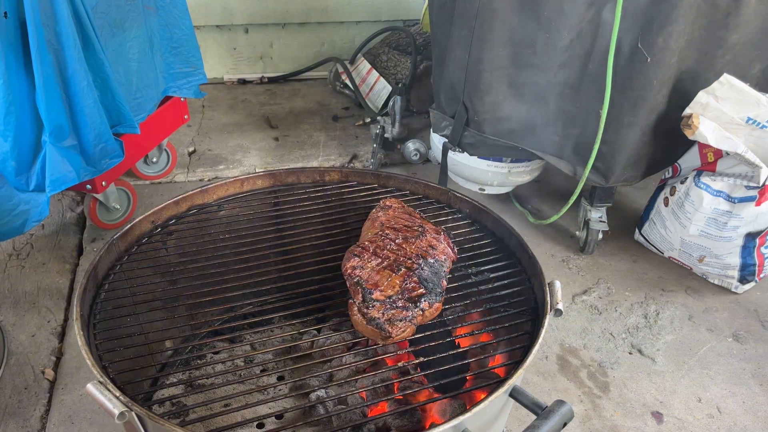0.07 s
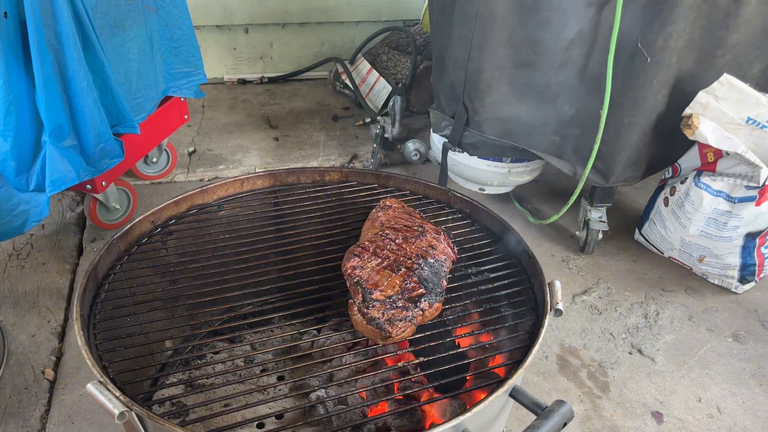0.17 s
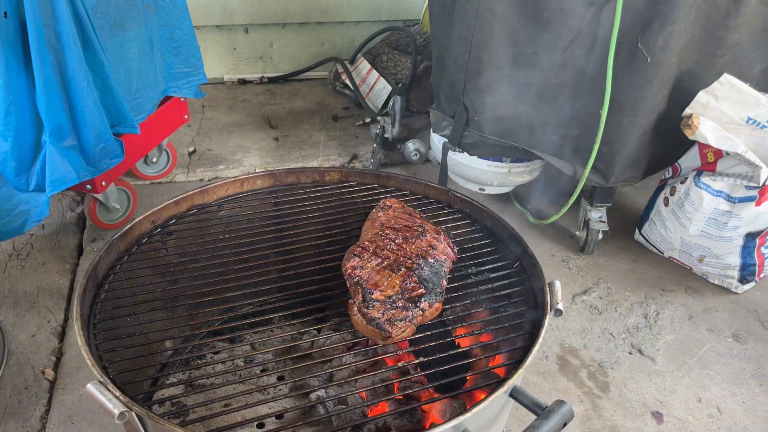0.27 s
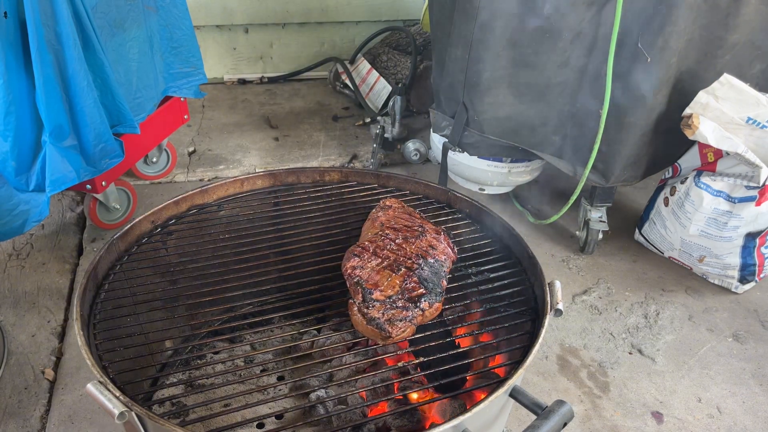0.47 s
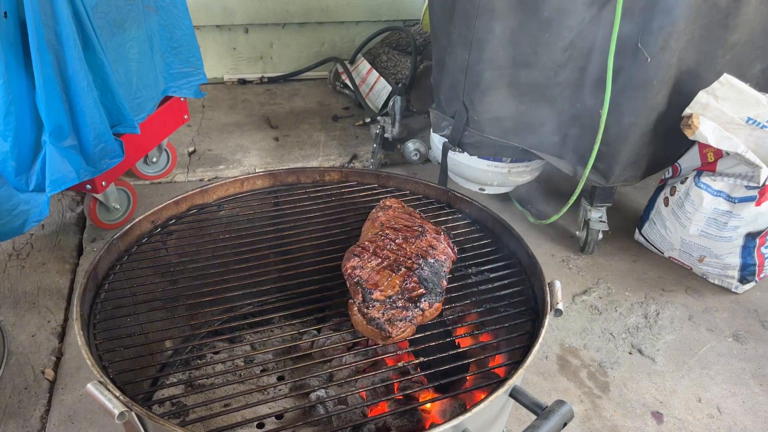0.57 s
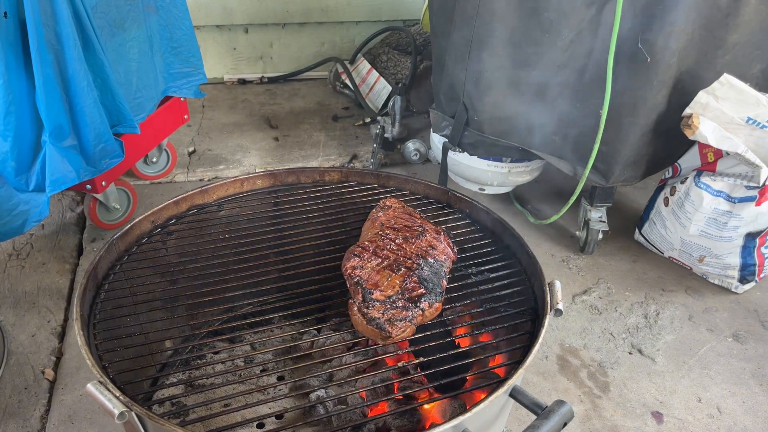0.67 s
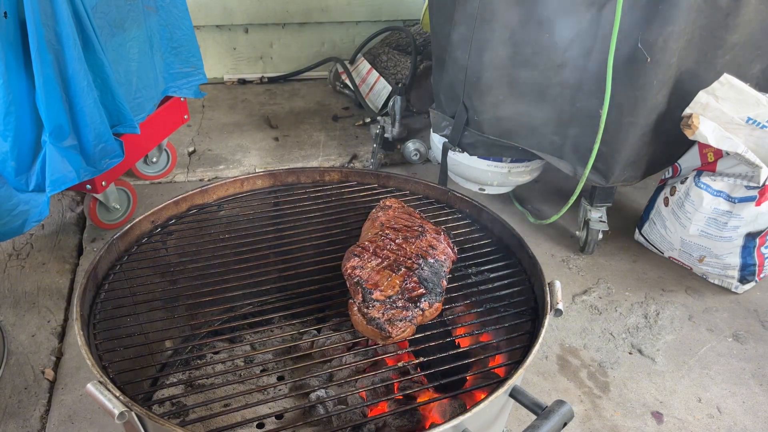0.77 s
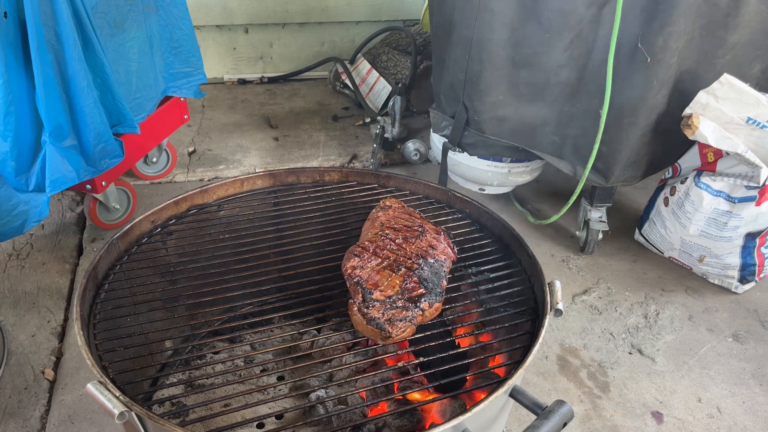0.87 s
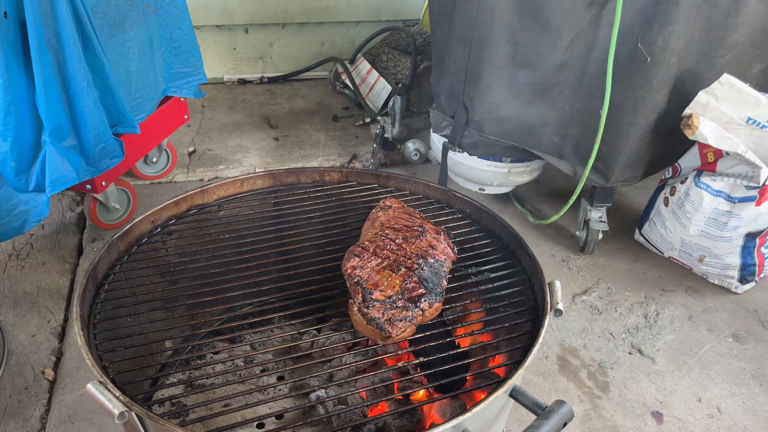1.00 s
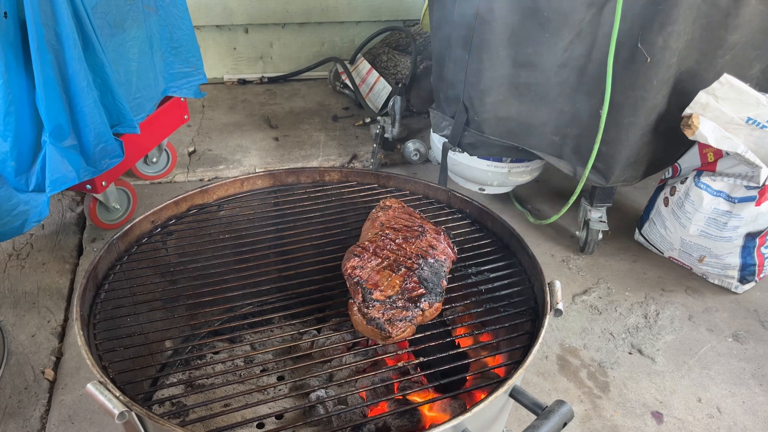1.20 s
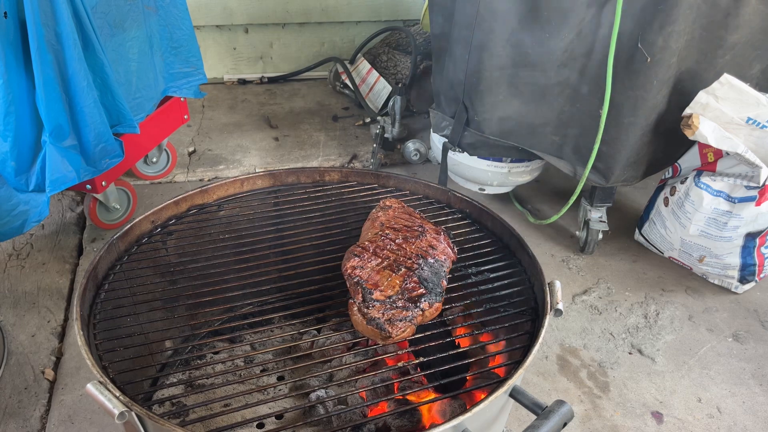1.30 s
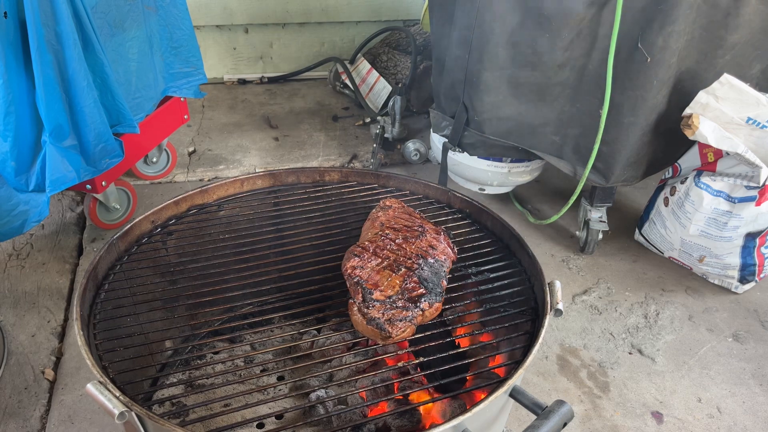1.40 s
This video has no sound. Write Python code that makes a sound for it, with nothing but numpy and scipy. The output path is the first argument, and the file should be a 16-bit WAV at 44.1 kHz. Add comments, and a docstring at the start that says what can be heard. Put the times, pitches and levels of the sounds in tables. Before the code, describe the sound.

A door bumps at about 0.25 seconds, slightly to the left, its hollow panel booming on, just after one faint ember tick from a charcoal grill. The latch clacks at 0.35 seconds. From 0.7 seconds the door slides with a soft rubbing swell and light knocks, ending near 1 second in a ringing metal double clack. A low outdoor rumble and faint hiss continue throughout.

```python
"""On a covered patio, a low outdoor rumble and a faint hiss go on throughout.
First an ember in a charcoal grill ticks once. Then something like a door bumps out of sight:
its hollow panel booms on and its latch clacks. Next it slides with a soft rubbing swell,
knocking lightly on its way. The slide ends in a double clack of ringing metal, like a latch."""
import sys
import numpy as np
from scipy import signal
from scipy.fft import rfft, irfft
from scipy.io import wavfile

SR = 44100
rng = np.random.default_rng(int(sys.argv[2]) if len(sys.argv) > 2 else 0)


def generate_wav(sig):
    """Save sig (samples, or channels by samples) to the path in sys.argv[1] as 16-bit PCM at SR."""
    pcm = np.round(np.clip(np.atleast_2d(sig).T, -1, 1) * 32767).astype(np.int16)
    wavfile.write(sys.argv[1], SR, pcm)


N = 63945
T = np.arange(N) / SR

# how alike the door's noises are on the left and right: (frequency [Hz], likeness [1 = the same])
DOOR_LIKENESS = [(130, .99), (300, .9), (520, .8), (1000, .65), (2000, .8), (4000, .68), (6500, .65),
                 (9000, .88)]


def from_db(db):
    """Turn decibels into a number to multiply by."""
    return 10 ** (np.asarray(db) / 20)


def unit_level(x):
    """Scale a sound so that its average power is 1."""
    return x / np.sqrt(np.mean(x ** 2) + 1e-20)


def at_hz(table, hz):
    """Read a table between its rows, giving each octave equal room."""
    row_hz, value = np.transpose(table)
    return np.interp(np.log(hz + 1e-9), np.log(row_hz), value)


def cut(x, keep, hz, order=2):
    """Keep the "low" or the "high" side of a frequency."""
    return signal.sosfilt(signal.butter(order, hz, keep, fs=SR, output="sos"), x + 1e-18)


def flicker(rate_hz):
    """A smooth random wobble, about 1 in size."""
    r = np.exp(-2 * np.pi * rate_hz / SR)
    return unit_level(signal.lfilter([1], [1, -2 * r, r * r], rng.standard_normal(2 * N))[N:])


def clicks(rows):
    """One click for each (time [s], level [dB])."""
    out = np.zeros(N)
    for s, db in rows:
        out[int(s * SR)] += from_db(db)
    return out


def ring(force, tones):
    """A push sets an object's own tones ringing; each drops 60 dB in its fade time."""
    out = 0
    for hz, db, fade_s in tones:
        r = np.exp(-np.log(1000) / (fade_s * SR))
        w = 2 * np.pi * hz / SR
        tone = signal.lfilter([0, np.sin(w)], [1, -2 * r * np.cos(w), r * r], force + 1e-18)
        out = out + from_db(db) * tone
    return out


def noise(spectrum, likeness, envelope=lambda hz: 1):
    """Stereo noise built in narrow bands; the envelope shapes the loudness of each band."""
    edges = 22 * 2 ** (np.arange(30) / 3)  # three bands to the octave
    white = rng.standard_normal((2, 2, N + SR // 10))
    out, power = 0, 0
    for k, (low, high) in enumerate(zip(edges, edges[1:])):
        band_filter = signal.butter(2, [low, high], "band", fs=SR, output="sos")
        common, side = signal.sosfilt(band_filter, white[k % 2])[:, -N:]
        hz = np.sqrt(low * high)
        alike = np.clip(at_hz(likeness, hz), -1, 1)
        band = unit_level(np.sqrt(1 + alike) * common + np.sqrt(1 - alike) * side * [[1], [-1]])
        gain = from_db(at_hz(spectrum, hz)) * np.sqrt(high - low)
        out = out + gain * envelope(hz) * band
        power += gain ** 2
    return out / np.sqrt(power)


def background():
    """The open air carries a distant rumble and an even hiss."""
    # the rumble's shape: (frequency [Hz], relative level [dB])
    rumble = [(20, -47), (40, -37), (57, 2), (80, -8), (120, -8.5), (200, -15.5), (400, -19.5), (1000, -29),
              (3000, -42.5)]
    # the hiss's shape: (frequency [Hz], relative level [dB])
    hiss = [(300, -21), (1500, -1.5), (3200, 2.5), (4500, 0.5), (6300, 2.5), (8500, 2), (10500, 6.5),
            (13000, -1), (15500, 0)]
    # how alike left and right are: (frequency [Hz], likeness [1 = the same])
    likeness = [(60, .97), (150, .9), (300, .55), (600, .25), (1300, .1), (2400, .75), (4800, .5),
                (9000, .82)]
    return from_db(-48) * noise(rumble, likeness) + from_db(-52) * noise(hiss, likeness)


def ember():
    """Two tiny, thin snaps in the charcoal, so close that they make one tick."""
    # the snaps: (time [s], relative level [dB])
    snaps = [(0.1202, -29), (0.1221, -29.5)]
    # the charcoal's tones: (frequency [Hz], relative level [dB], fade time [s])
    tones = [(3650, -10, 0.0018), (10000, 5, 0.0005), (14200, -8, 0.00091)]
    return cut(ring(clicks(snaps), tones), "high", hz=1500, order=1)


def latch():
    """Each clack stops the metal's ring and strikes it afresh, with a crack and a wash of echoes."""
    # the clacks: (time [s], relative level [dB], treble lift [dB])
    clacks = [(0.3504, -6, 2), (0.9642, -4, -4), (0.9687, -4.5, -2.5), (0.9911, -3.5, -0.5)]
    # the metal's tones: (frequency [Hz], relative level [dB], fade time [s])
    tones = [(1220, -46.5, 0.4), (2070, -43, 0.19), (2169, -41, 0.16), (2850, -47, 0.22), (2960, -35, 0.14),
             (3320, -38.5, 0.091), (5360, -40.5, 0.22), (6830, -35.5, 0.12), (7750, -48, 0.21),
             (9420, -42.5, 0.095)]
    # the noise of a clack: (frequency [Hz], relative level [dB])
    spectrum = [(500, -18), (1200, -5), (2200, -2), (4200, -8.5), (5500, 5.5), (7500, -6), (11000, -6.5),
                (16000, -12)]
    wash_fade_s, crack_s = 0.23, 0.0027
    next_times = [row[0] for row in clacks[1:]] + [np.inf]
    out = 0
    for (s, db, lift_db), next_s in zip(clacks, next_times):
        strike_db = lambda hz: db + lift_db * np.clip(np.log2(hz / 4000), -1, 1)
        struck_tones = [(hz, level + strike_db(hz), fade_s) for hz, level, fade_s in tones]
        metal = (T < next_s) * ring(clicks([(s, 0)]), struck_tones)
        age = np.maximum(T - s, 0)
        wash = np.exp(-np.log(1000) * age / wash_fade_s)
        crack = from_db(3) * np.exp(-age / crack_s)
        rush = noise(spectrum, DOOR_LIKENESS, lambda hz: from_db(strike_db(hz)))
        out = out + metal + from_db(-36.5) * (T >= s) * (wash + crack) * rush
    return out


def brush():
    """The panel brushes lightly before it takes weight and slides."""
    # the brushing noise: (frequency [Hz], relative level [dB])
    spectrum = [(700, 0), (2000, -2), (3300, 7), (5000, -3), (7000, -0.5), (10000, 0.5), (16000, -19)]
    start_s, rise_s, hold_s, fall_s = 0.629, 0.019, 0.089, 0.11
    age = T - start_s
    touch = np.clip(age / rise_s, 0, 1) * np.exp(-np.maximum(age - hold_s, 0) / fall_s)
    return from_db(-48.5) * touch * noise(spectrum, DOOR_LIKENESS)


def slide():
    """Grainy rubbing follows how hard the door is pushed and sets a few tones singing."""
    # the push: (time [s], effort [dB])
    effort = [(0.722, -21), (0.742, 2), (0.82, 0), (0.875, 4), (0.935, -1.5), (1.0, 1), (1.04, -6),
              (1.10, -12), (1.45, -27.5)]
    # the rubbing noise: (frequency [Hz], relative level [dB])
    spectrum = [(50, -12), (78, 14), (140, 8), (260, -1), (430, 2), (850, -7), (1100, -3.5), (2100, -4),
                (3300, -7.5), (4800, -15), (9000, -17), (16000, -26)]
    # the tones that sing: (frequency [Hz], relative level [dB], fade time [s])
    tones = [(138, -36.5, 0.53), (371.7, -50, 0.51), (418.8, -40, 0.29), (632, -54, 0.26), (760, -53, 0.85),
             (1069, -42, 0.45), (1344, -40.5, 0.33), (1630, -44, 0.19), (2070, -39, 0.13),
             (2420, -50, 0.084), (2860, -38, 0.085), (3225, -37.5, 0.11), (3327, -44, 0.11)]
    effort_db = np.interp(T, *np.transpose(effort), left=-100)
    friction = from_db(effort_db + flicker(rate_hz=160))  # about 1 dB of grain
    singing = from_db(-42) * ring(friction * rng.standard_normal(N), tones)
    rubbing = from_db(-41) * friction * noise(spectrum, DOOR_LIKENESS)
    return rubbing + singing


def thump():
    """Rattle and echoes build up after the door's first touch and die away, the treble first."""
    # the thump's noise: (frequency [Hz], relative level [dB])
    spectrum = [(45, -27), (120, 0.5), (220, -4), (320, -3.5), (480, -5.5), (700, -12), (1500, -12),
                (3200, -14.5), (4600, -23.5), (7000, -24.5), (10000, -28), (16000, -46)]
    # how fast it swells: (frequency [Hz], build-up time [s])
    build_times = [(100, 0.021), (1000, 0.014), (3000, 0.015), (7000, 0.0016)]
    # how fast it dies away: (frequency [Hz], fade time [s])
    fade_times = [(100, 1), (450, 0.76), (1200, 0.59), (3200, 0.43), (8000, 0.23)]
    start_s, first_touch_share, crack_s = 0.2372, 0.35, 0.003
    age = T - start_s

    def envelope(hz):
        build_s = at_hz(build_times, hz)
        rise = first_touch_share + (1 - first_touch_share) * np.clip(age / build_s, 0, 1)
        crack = 0.33 * np.exp(-np.maximum(age, 0) / crack_s)
        fade = np.exp(-np.log(1000) * np.maximum(age - build_s, 0) / at_hz(fade_times, hz))
        return (age > 0) * (rise + crack) * fade
    return from_db(-23.5) * noise(spectrum, DOOR_LIKENESS, envelope)


def panel():
    """Hard and soft bumps ring the same hollow panel, which gives off little deep bass."""
    # the panel meets its frame hard, then with its full weight, bounces once, and later knocks softly:
    # (time [s], relative level [dB], brightness [Hz])
    bumps = [(0.2389, -11, 619.7), (0.25, -2.5, 486), (0.2649, 1.5, 220), (0.2776, 0, 228),
             (0.2998, -9.5, 715), (0.7444, -23, 467), (0.8302, -14.5, 181.5), (0.8579, -14, 175),
             (0.9243, -14.5, 171), (1.055, -24.5, 172)]
    # the panel's tones: (frequency [Hz], relative level [dB], fade time [s])
    tones = [(59.3, -34, 0.67), (80.1, -34.5, 1.95), (118.4, -33.5, 1.8), (137.4, -31, 1.2),
             (151, -18, 0.2), (159, -23.5, 1.53), (177, -42, 2.15), (198.3, -28.5, 1.05),
             (234.3, -34.5, 0.57), (256.5, -31.5, 0.48), (373.5, -29.5, 0.87), (411, -31, 0.73),
             (459.6, -31.5, 0.61), (478, -19, 0.4), (535, -37, .55), (558.4, -38, 1.1), (640.2, -27, 0.26),
             (672, -29, 0.36), (758, -21, 0.42), (840, -33, .55), (1068, -28, 0.33), (1188, -29.5, 0.32),
             (1464, -21, 0.33)]
    force = sum(cut(clicks([(s, db)]), "low", hz) for s, db, hz in bumps)  # softer means less treble
    return cut(ring(force, tones), "high", hz=115)


def reflect(x):
    """Nearby walls and furniture add quick echoes that colour the sound at about the same loudness."""
    # the echoes: (delay [s], relative level [dB])
    echoes = [(.0047, -14), (.0108, -9), (.0174, -12.5), (.0266, -9)]
    hz = np.arange(N + 1) * SR / (2 * N)
    paths, power = 1, 1
    for s, db in echoes:
        paths = paths + from_db(db) * np.exp(-2j * np.pi * hz * s)
        power += from_db(db) ** 2
    return irfft(rfft(x, 2 * N) * paths)[:, :N] / np.sqrt(power)


def microphones(x, off_centre=1):
    """Two microphones hear a sound slightly out of step, and unequally if it is off to one side."""
    # how far the left wave runs ahead: (frequency [Hz], lead [radians])
    lead = [(60, .1), (150, .38), (500, 1.15), (1400, 1.0), (3100, -.9), (4600, -.9), (5700, -3),
            (7300, -2.1), (8000, 0), (9600, .1), (12400, 3.1), (15500, 6)]
    # the level gap when off_centre is 1: (frequency [Hz], left minus right [dB])
    balance = [(150, -0.5), (300, 0), (500, 4), (1100, 5), (1800, 4), (2600, -2), (5500, -4), (8000, 0)]
    hz = np.arange(N + 1) * SR / (2 * N)
    left = from_db(off_centre * at_hz(balance, hz) / 2) * np.exp(.5j * at_hz(lead, hz))
    return irfft(rfft(x, 2 * N) * np.array([left, 1 / left]))[:, :N]


def scene():
    """The door off to the left, the grill in front, the open air around."""
    door = panel() + reflect(thump() + slide() + brush()) + latch()
    return microphones(door) + microphones(ember() + background(), off_centre=0.26)


def record(dry):
    """The highest treble, above 16000 Hz, is cut steeply."""
    return signal.sosfilt(signal.ellip(10, .1, 80, 16000, fs=SR, output="sos"), dry)


dry = scene()
out = record(dry)
generate_wav(out)
```